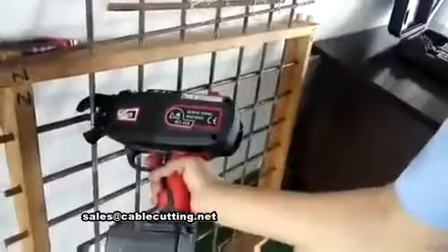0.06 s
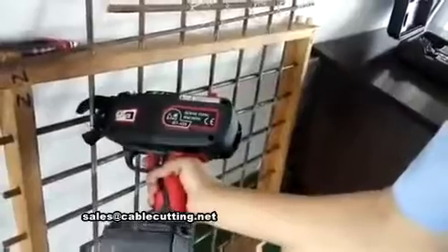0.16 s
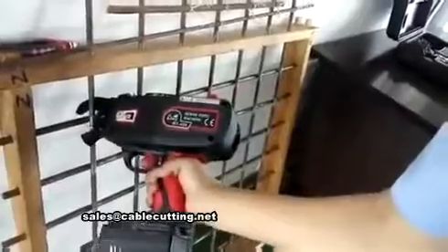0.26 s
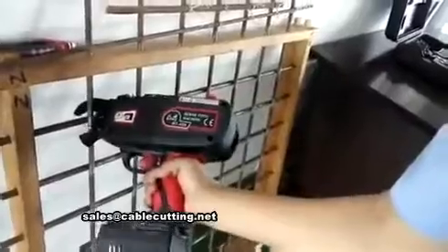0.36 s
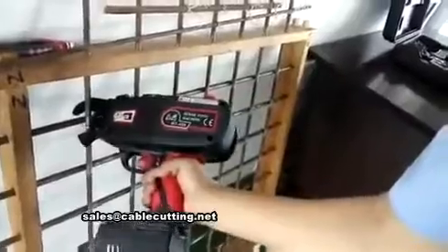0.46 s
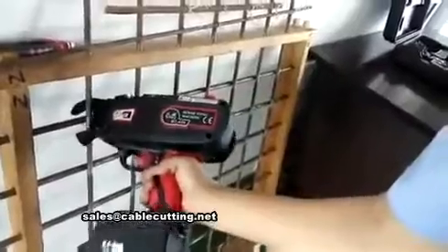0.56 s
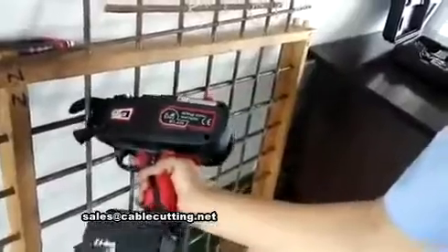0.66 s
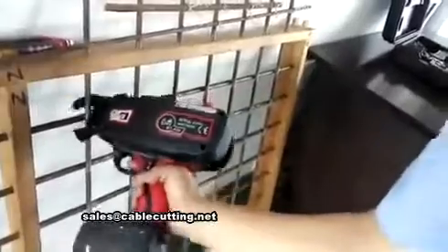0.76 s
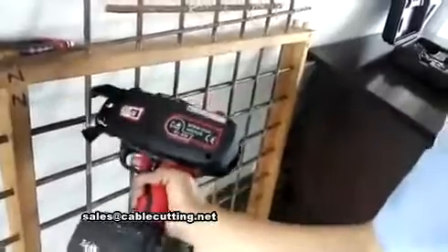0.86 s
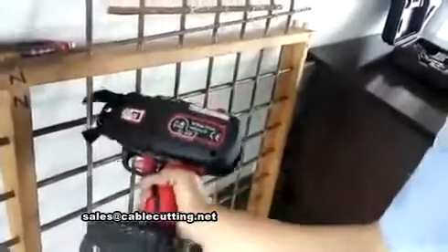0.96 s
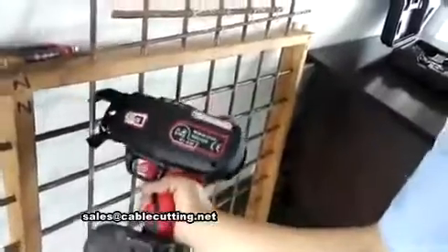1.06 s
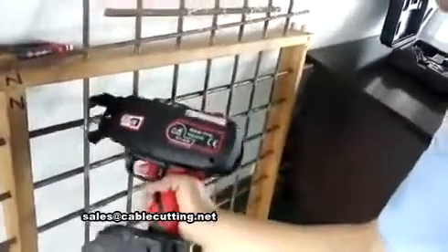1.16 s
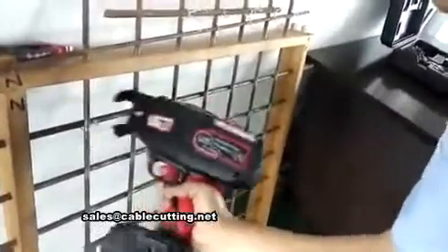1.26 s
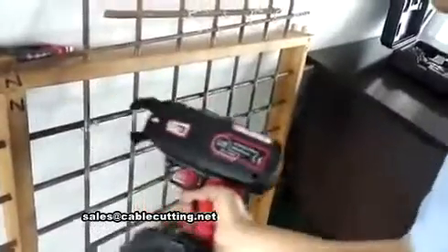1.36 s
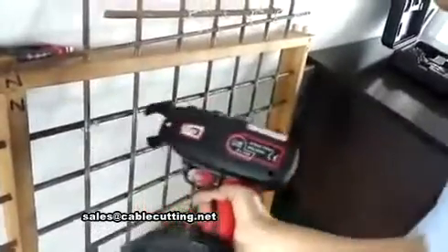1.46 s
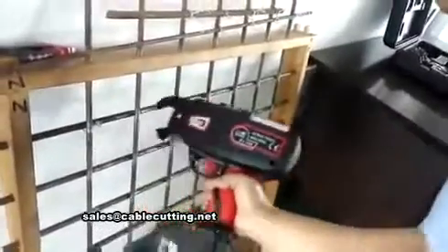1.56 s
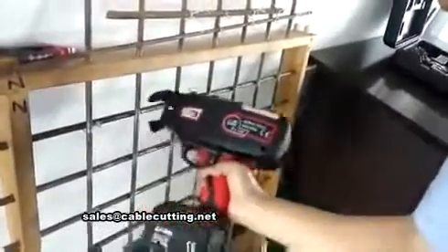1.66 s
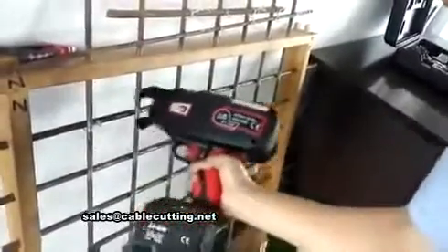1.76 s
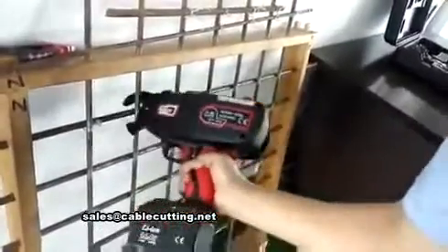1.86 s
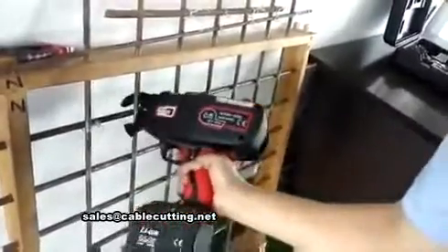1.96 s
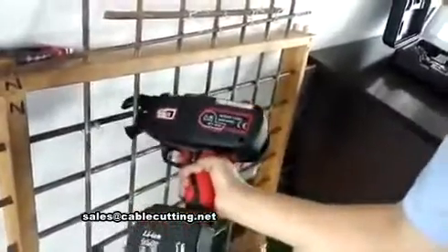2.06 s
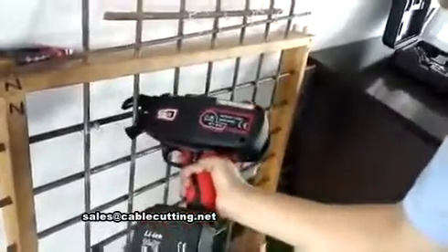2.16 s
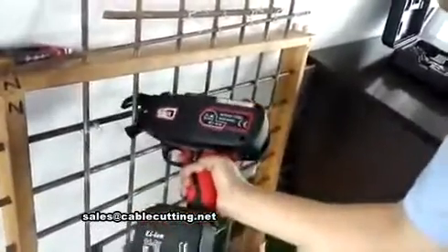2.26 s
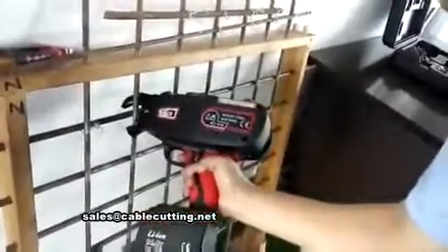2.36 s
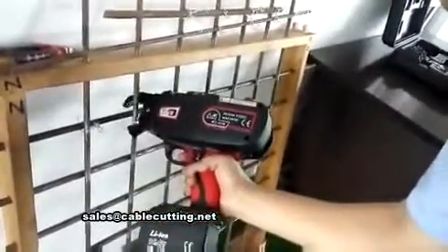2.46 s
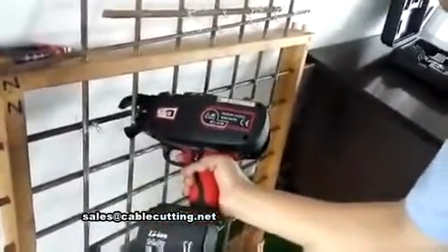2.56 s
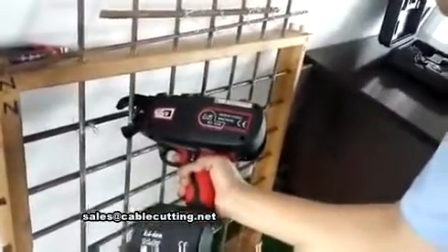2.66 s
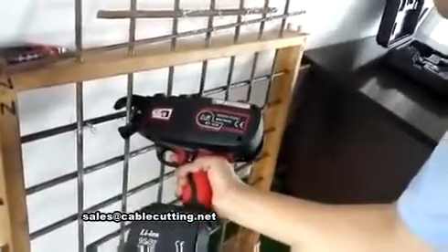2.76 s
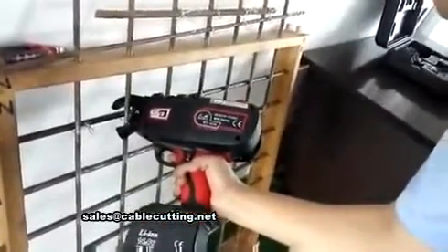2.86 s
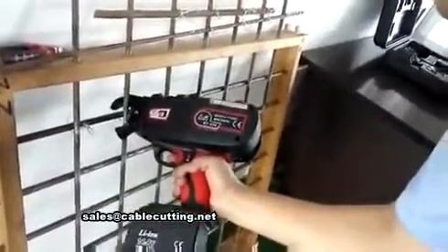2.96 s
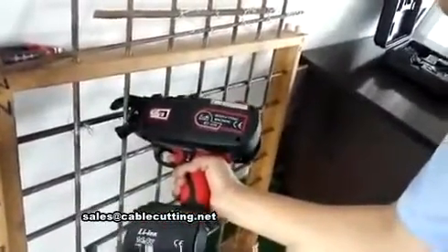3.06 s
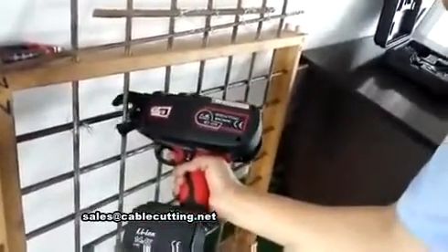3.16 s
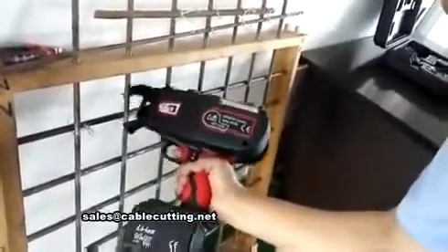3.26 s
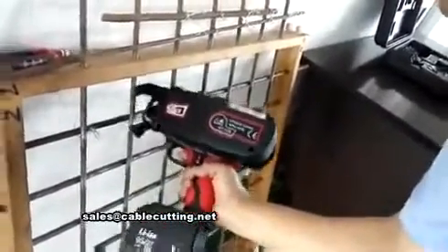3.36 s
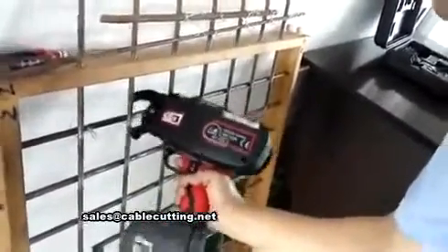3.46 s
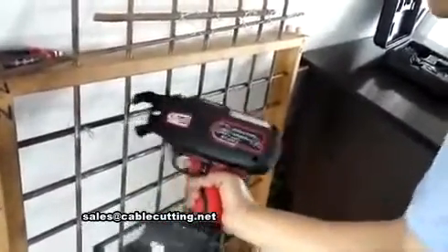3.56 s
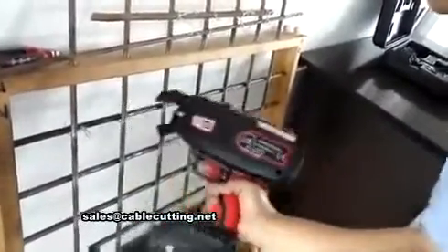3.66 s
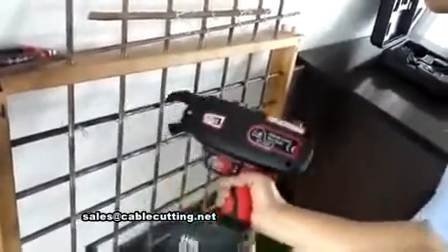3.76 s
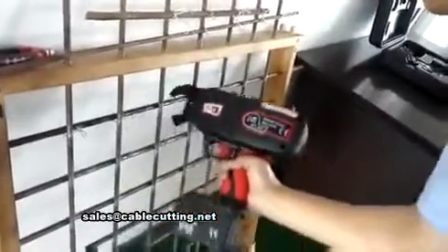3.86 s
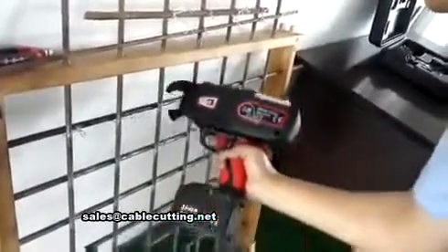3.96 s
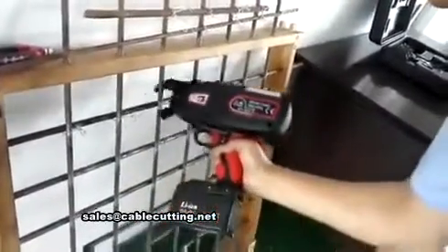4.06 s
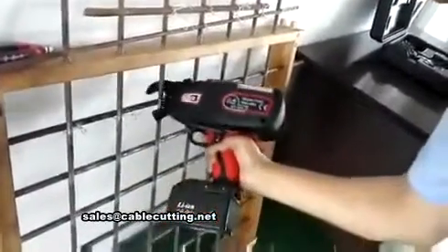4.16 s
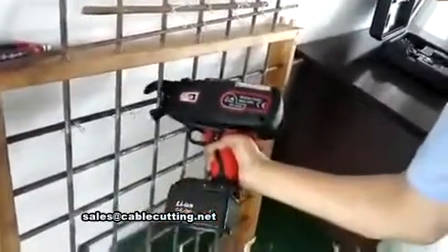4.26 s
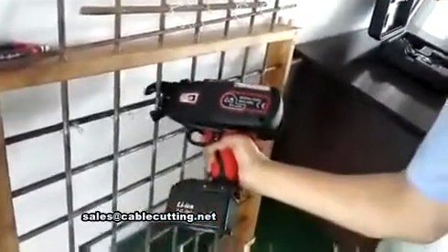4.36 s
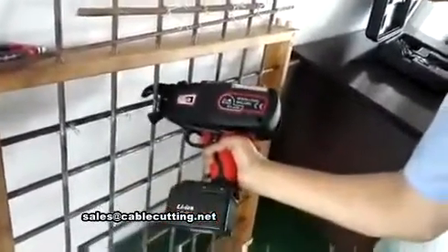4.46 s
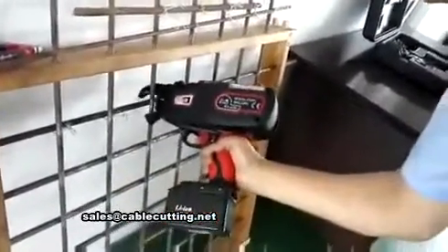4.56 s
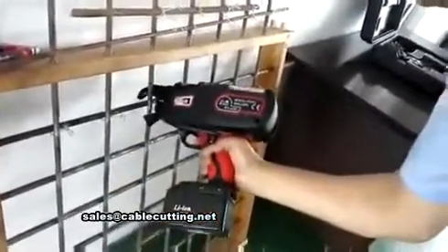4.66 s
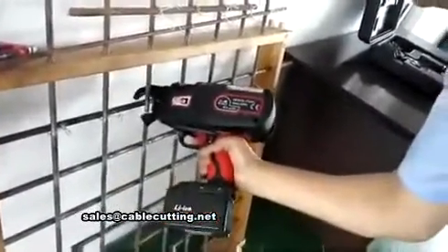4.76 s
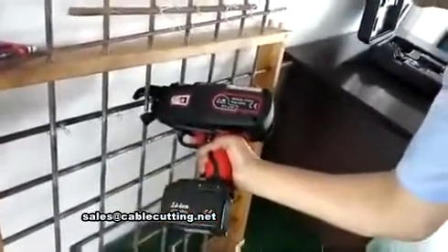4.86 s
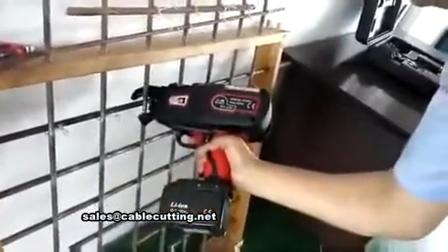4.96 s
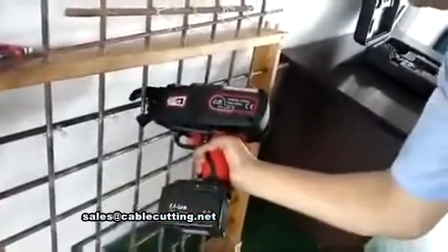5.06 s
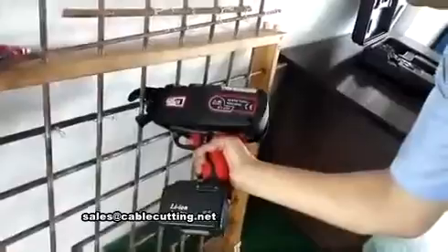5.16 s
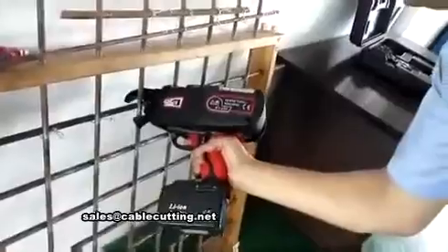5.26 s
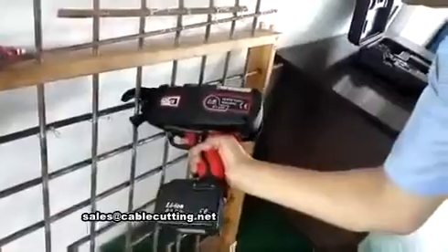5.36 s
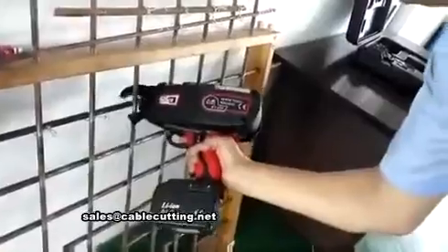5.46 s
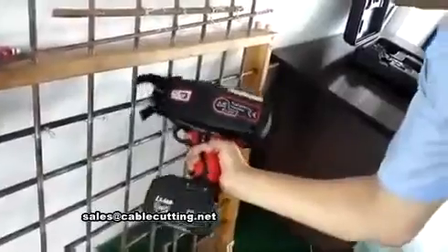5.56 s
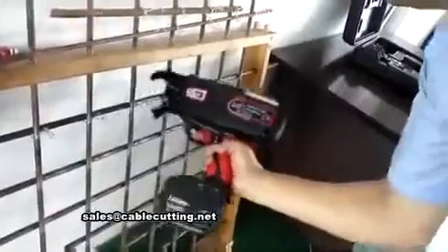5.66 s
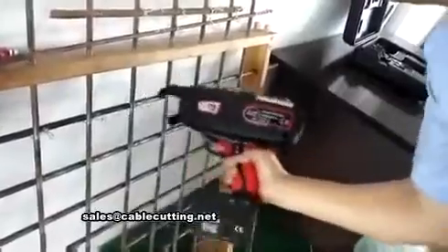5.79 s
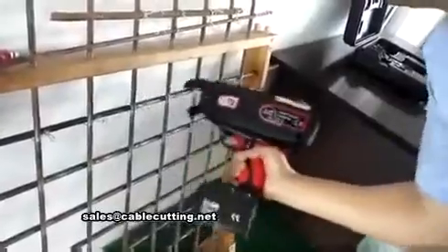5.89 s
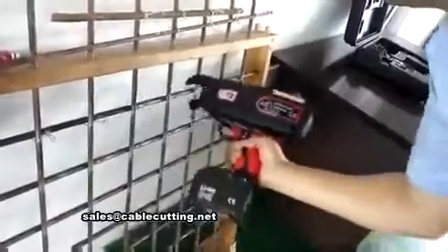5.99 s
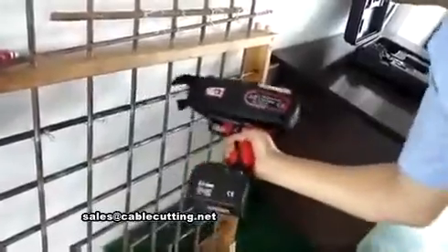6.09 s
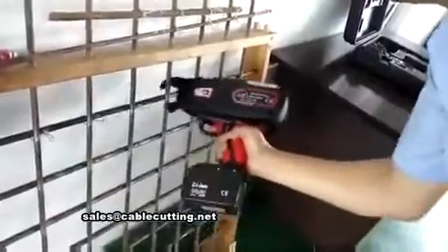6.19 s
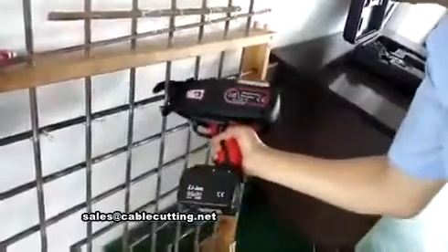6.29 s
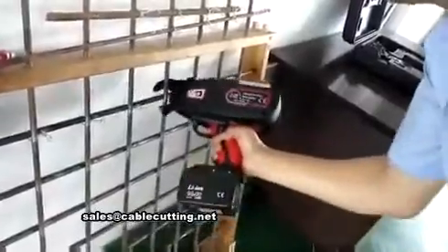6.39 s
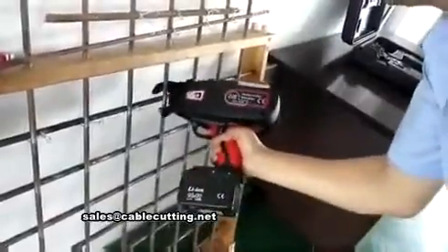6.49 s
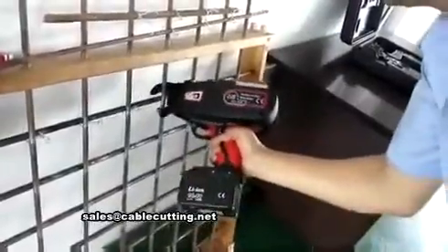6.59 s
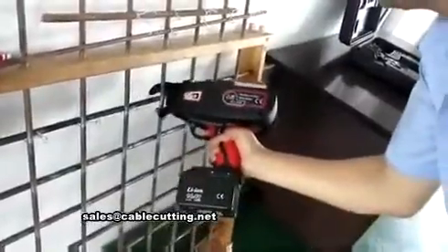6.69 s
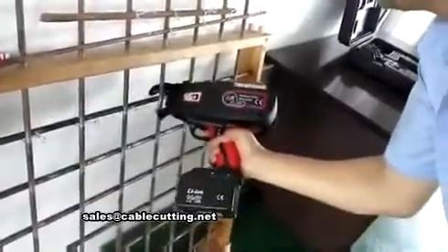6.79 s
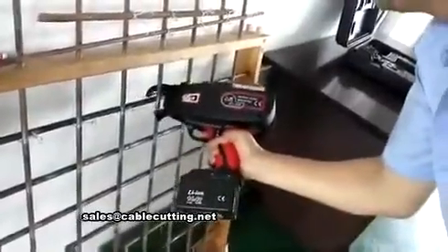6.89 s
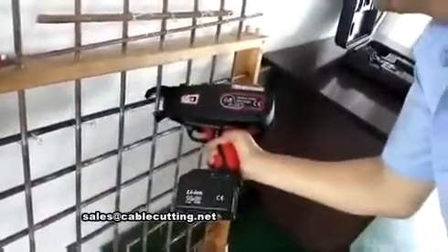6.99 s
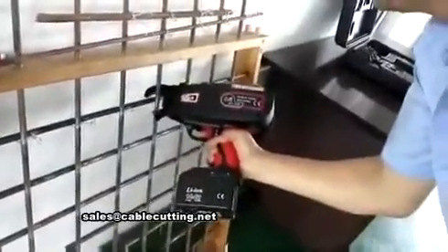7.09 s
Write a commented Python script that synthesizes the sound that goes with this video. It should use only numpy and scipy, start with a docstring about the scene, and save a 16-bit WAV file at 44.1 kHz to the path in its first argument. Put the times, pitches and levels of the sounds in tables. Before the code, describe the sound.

A cordless rebar tying tool buzzes, clacks and whines in repeated bursts, its nose jerking free with clattering booms from a framed steel mesh indoors.

```python
"""Whining, clattering bursts of a cordless rebar tier, then booms and rattles of a steel mesh in a wooden frame.
In each tie gear noise and wire rasp spin up, slack gears tick as the drive creeps, a tooth whine twists and
sags under load, and the drive ticks home; shaped contact noise makes the clacks inside the casing.
Pulling the nose free cracks, rings the mesh modes and shakes the frame. A bare room echoes it all over soft air."""
import sys
import numpy as np
from scipy import signal
from scipy.fft import rfft, irfft, next_fast_len
from scipy.io import wavfile
from scipy.ndimage import uniform_filter1d, map_coordinates

SR = 44100
rng = np.random.default_rng(int(sys.argv[2]) if len(sys.argv) > 2 else 0)


def unload_wav(signal):
    """Save mono or channel-first audio to the path in sys.argv[1] as 16-bit WAV at rate SR, clipped to [-1, 1]."""
    wavfile.write(
        sys.argv[1],
        SR,
        np.round(np.clip(np.atleast_2d(signal).T, -1, 1) * 32767).astype(np.int16),
    )


N = 314433
TIME = np.arange(N) / SR

# All levels in the tables are relative: the layers trim them further.
# The ties. Each row: trigger in seconds, wait for the twist in seconds, twist length in seconds, way home
# in seconds, loudness in dB, sag of the whine at full load in Hz, homing gears in dB, end stop in dB.
TIES = [(-0.518, 0.55, 0.693, 0.19, -0.65, 345.4, -21, -5.5),
        (1.928, 0.55, 0.603, 0.22, 0.06, 285.7, -19.5, -14.5),
        (4.167, 0.56, 0.69, 0.192, 0, 315.7, -22, -7), (6.329, 0.542, 0.63, 0.2, -1.07, 330.4, -12, -12)]
# The nose snags on the mesh. Each row: time in seconds, crack of the bars in dB, boom in dB, knock of the
# frame in dB.
SNAGS = [(1.214, -19, -30, -38), (1.234, -2.5, -18, -22), (1.311, -9.5, -29, -6), (1.32, -7.5, -20.5, -6.5),
         (1.342, -17, -21, -16.5), (3.567, -11.5, -14.5, -9.5), (3.577, -5.5, -15.5, -6),
         (3.66, -14, -23, -11), (3.68, -9.5, -20, -12.5), (3.739, -18.5, -27, -12),
         (5.756, -19, -26.5, -30)]
# The nose slides off the tied wire. Each row: time in seconds, peak in dB.
SCRAPES = [(3.48, -39), (5.81, -28.5)]
# The tool leans on the frame. Each row: time in seconds, peak in dB.
LEANS = [(0.9, -31.5), (3.2, -32), (5.6, -31), (5.95, -31.5)]
# A feed stroke jolts, eases and pulls again. Each row: seconds after the trigger, gear chatter in dB.
FEED_CHATTER = [(0, -18.5), (0.035, -14), (0.06, -24.5), (0.13, -16), (0.2, -18), (0.274, -23)]

# Spectra of the wire feed, creeping gears, twisting gears, clacks in the casing, mesh contacts, frame boom,
# room air, wire scrape and frame knock. Each row: frequency in Hz, noise density in dB.
FEED_COLOUR = [(100, -10.5), (550, -11.5), (760, 2.5), (1050, -0.5), (2100, -2.5), (2900, -2), (4200, -3),
               (7000, -8.5), (10000, -19.5), (14500, -21)]
CREEP_COLOUR = [(100, -29.5), (330, -6.5), (600, -12.5), (790, 1), (1000, -6), (1400, 6.5), (1900, -3),
                (3200, -6.5), (5000, -9), (7000, -17), (10000, -23.5), (14500, -28)]
TWIST_COLOUR = [(100, -30), (300, -9.5), (520, -6), (630, -8.5), (800, -1), (1250, 0.5), (2100, 2.5),
                (2650, -1), (3400, 2.5), (5200, -0.5), (7200, -7), (10000, -10), (14500, -14.5)]
CLACK_COLOUR = [(100, -12.5), (400, -6), (900, -0.5), (1400, 6), (2200, -2), (4000, -5), (7000, -7.5),
                (14500, -23)]
MESH_COLOUR = [(100, -6.5), (230, -1), (360, 3.5), (550, -7), (800, -0.5), (1200, 4), (2100, -5.5),
               (2800, -1.5), (4500, -5.5), (7000, -6), (10000, -23), (14500, -25.5)]
SWAY_COLOUR = [(25, -39), (42, -36), (68, 0.5), (110, -6.5), (150, -2), (220, -6), (350, -15.5), (500, -21),
               (1000, -50), (4000, -91)]
AIR_COLOUR = [(25, -10), (70, 4.5), (200, 5), (270, -0.5), (340, 1), (500, -5), (1200, -3.5), (2700, -7.5),
              (4500, -13), (7000, -12), (10000, -23), (14500, -25.5)]
SCRAPE_COLOUR = [(300, -5), (1500, 10), (5000, -5), (12000, -4.5)]
KNOCK_COLOUR = [(100, -8), (350, -5.5), (700, -2), (1300, 2.5), (2000, -16), (6000, -32.5)]

# Resonances of the gear casing while feeding and twisting. Each row: frequency in Hz, width in Hz, level in dB.
FEED_RINGS = [(1422, 273, -4), (1620, 120.4, 0.5)]
TWIST_RINGS = [(1277, 173, -7.5), (1443, 150, -5), (1617, 79, -3)]
# Ringing modes of mesh and frame. Each row: frequency in Hz, level in dB, time to fall 60 dB in seconds.
MESH_MODES = [(111, 0, 0.44), (118.8, -4.5, 0.36), (186, -9.5, 0.49), (210.4, -8, 0.5), (270, -6, .3),
              (353, 0, 0.11), (705, -15, 0.98), (1100, -20, .45), (1120, -19, .4), (1330, -18, .3),
              (1580, -5, .4), (2584, -16, .5), (2690, -25, 1), (7100, -31, 0.74)]
# The room's decay. Each row: frequency in Hz, time to fall 60 dB in seconds.
ROOM_T60 = [(100, 1), (500, 1), (1500, 0.8), (4000, 1), (8000, 0.43), (14000, 1)]

TRIGGER, WAIT_S, TWIST_S, HOMING_S, TIE_DB, SAG_HZ, HOMING_DB, STOP_DB = np.transpose(TIES)
TWIST_START = TRIGGER + WAIT_S
TWIST_END = TWIST_START + TWIST_S
HOME = TWIST_END + HOMING_S
# Every tie feeds, cuts and grips at the same times: seconds after the trigger.
FEED_S, CUT_S, GRIP_S = 0.276, 0.319, 0.478


def from_db(db):
    """Turn decibels into an amplitude factor."""
    return 10 ** (np.asarray(db) / 20)


def rms_one(x):
    """Scale a signal to an rms of 1."""
    return x / np.sqrt(np.mean(x ** 2) + 1e-20)


def at_hz(points, hz):
    """Read a table on a log-frequency axis."""
    known, values = np.transpose(points)
    return np.interp(np.log(np.maximum(hz, 1)), np.log(known), values)


def drift(hz):
    """Random wander of rms 1 through about two new values per cycle of the given rate."""
    knots = rng.standard_normal(int(N / SR * hz * 2) + 2)
    return rms_one(np.interp(TIME, np.linspace(0, N / SR, len(knots)), knots))


def colour(x, points):
    """Causal (minimum-phase) filter with the given spectrum; white noise keeps its power."""
    size = 2 * next_fast_len(N // 2 + SR // 10)
    hz = np.arange(size // 2 + 1) * SR / size
    gain = rms_one(from_db(at_hz(points, hz)))
    # folding the cepstrum forward in time gives the minimum phase
    cepstrum = irfft(np.log(gain))[:size // 2]
    cepstrum[1:] *= 2
    response = np.exp(rfft(cepstrum, size))
    return irfft(rfft(x, size) * response)[..., :N]


def resonate(x, rings):
    """Parallel resonances of alternating sign; rms 1."""
    out = 0
    for k, (hz, width, db) in enumerate(rings):
        r = np.exp(-np.pi * width / SR)
        poles = [1, -2 * r * np.cos(2 * np.pi * hz / SR), r * r]
        ring = (1 - r * r) * signal.lfilter([1, 0, -1], poles, x)
        out = out + (-1) ** k * from_db(db) * ring
    return rms_one(out)


def grains(per_s, spread_db, hiss):
    """Random metal contacts of uneven size over a sliding hiss; rms 1."""
    born = rng.random(N) < per_s / SR
    white = rng.standard_normal(N)
    size_db = spread_db * np.minimum(rng.exponential(1, N)[born], 4)
    clicks = np.zeros(N)
    clicks[born] = from_db(size_db) * np.sign(white[born])
    return rms_one(rms_one(clicks) + hiss * white)


def throb(turns, fade, depth, uneven_db):
    """Once a turn the gears bite, each time with another force, and relax within a share of the turn."""
    bite_forces = from_db(uneven_db * rng.standard_normal(int(turns[-1]) + 1))
    force = bite_forces[turns.astype(int)]
    return rms_one(1 + depth * force * np.exp(-(turns % 1) / fade))


def stroke(starts, ends, edge_s):
    """For a motor that runs between these times: soft gate, age (s), progress (0-1) and number of the run."""
    run = np.maximum(np.searchsorted(starts, TIME + edge_s) - 1, 0)
    age, length = TIME - starts[run], (ends - starts)[run]
    running = (age >= 0) * (age < length) * 1.
    on = uniform_filter1d(running, max(1, int(edge_s * SR)))
    age = np.clip(age, 0, length)
    return on, age, age / length, run


def swells(times, levels_db, rise_s, fade_s):
    """Envelope of events that each rise to their time and die away; their powers add."""
    power = np.zeros(N)
    for s, db in zip(times, levels_db):
        near = slice(*np.searchsorted(TIME, [s - 8 * rise_s, s + 8 * fade_s]))
        age = TIME[near] - s
        shape = np.exp(-np.maximum(age / fade_s, -age / rise_s))
        power[near] += (from_db(db) * shape) ** 2
    return np.sqrt(power)


def bursts(times, levels_db, rise_s, fade_s):
    """Every blow is a flurry of contacts with a short soft rise and a longer fall."""
    return swells(times, levels_db, rise_s, fade_s) * grains(per_s=4000, spread_db=1.5, hiss=0.97)


def two_ports(draws, alike_hz):
    """Diffuse sound at two close microphones: shared in the bass, unrelated above."""
    mid, side = draws
    side = signal.sosfilt(signal.butter(2, alike_hz, "high", fs=SR, output="sos"), side)
    return np.array([mid + side, mid - side]) / np.sqrt(2)


def room_air(level_db=-37.5):
    """The still room is a steady bed of coloured noise, wider in the treble than in the bass."""
    return from_db(level_db) * colour(two_ports(rng.standard_normal((2, N)), alike_hz=350), AIR_COLOUR)


def room(x, early_db, early_s, late_db):
    """Quick reflections from wall and frame, then a tail that dies band by band."""
    t = TIME[:SR]
    edges = np.geomspace(60, 16000, 9)  # Hz
    tail = 0
    for low, high in zip(edges, edges[1:]):
        band_pass = signal.butter(2, [low, high], "band", fs=SR, output="sos")
        band = signal.sosfilt(band_pass, rng.standard_normal((2, SR)))
        t60 = at_hz(ROOM_T60, np.sqrt(low * high))
        tail = tail + band * np.exp(-np.log(1000) * t / t60)
    sparse = rng.standard_normal((2, SR)) * (rng.random(SR) < .06)
    early = sparse * np.exp(-t / early_s) * (t > .001)
    response = from_db(early_db) * rms_one(early) + from_db(late_db) * rms_one(tail * (t > .008))
    ports = two_ports(response, alike_hz=463) / np.sqrt(SR)
    return signal.fftconvolve(x[None], ports, axes=1)[:, :N]


def moving_room(x, wander_s=0.000356, place_count=2):
    """The tool wanders over the mesh: each place has its own echoes, and their paths keep changing in length."""
    place = np.linspace(0, place_count - 1, N)
    echo = 0
    for k in range(place_count):
        share = np.cos(np.pi / 2 * np.minimum(abs(place - k), 1))
        echo = echo + room(x * share, early_db=0.0, early_s=0.01, late_db=-4.0)
    moved = []
    for side in echo:
        path = np.maximum(TIME - wander_s * (2 + drift(2.5)), 0)
        moved.append(map_coordinates(side, [path * SR], order=3))
    return np.array(moved)


def sway(held_db=-45.0, shaken_db=-9.0):
    """The whole frame booms as the tool leans on it and lets go; its lowest mode stands out."""
    times, _, booms_db, _ = np.transpose(SNAGS)
    shaken = swells(times, booms_db + shaken_db, rise_s=0.0051, fade_s=0.28)
    leaning = swells(*np.transpose(LEANS), rise_s=0.13, fade_s=0.19)
    rumble = colour(rng.standard_normal(N), SWAY_COLOUR)
    lowest_mode = resonate(rng.standard_normal(N), [(109.7, 16.6, 0)])  # Hz, width Hz, dB
    boom = from_db(-2.0) * rumble + from_db(-2) * lowest_mode
    return np.sqrt(from_db(held_db) ** 2 + shaken ** 2 + leaning ** 2) * boom


def scrapes():
    """Steel slides on wire with a short, bright rasp."""
    rasp = colour(grains(per_s=1700, spread_db=-2.5, hiss=0.6), SCRAPE_COLOUR)
    return swells(*np.transpose(SCRAPES), rise_s=0.032, fade_s=0.024) * rasp


def ring_mesh(times, booms_db):
    """Each jerk strikes every mode of mesh and frame, with slightly uneven force, and the modes ring out."""
    ringing = np.zeros(N)
    for hz, mode_db, t60 in MESH_MODES:
        blows = np.zeros(N)
        uneven_db = 0.61 * rng.standard_normal(len(times))
        blows[(times * SR).astype(int)] = from_db(booms_db + mode_db + uneven_db)
        r, w = from_db(-60 / (t60 * SR)), 2 * np.pi * hz / SR
        # the tiny offset keeps the filter clear of vanishingly small numbers
        ringing += signal.lfilter([.5, 0, -.5], [1, -2 * r * np.cos(w), r * r], blows + 1e-18)
    return ringing


def snags(crack_db=-7.5, rattle_db=-14.5, knock_db=-4, ringing_db=-8):
    """The nose jerks free: a crack, ringing bars, and the mesh knocking and chattering against its frame."""
    times, cracks_db, booms_db, knocks_db = np.transpose(SNAGS)
    ringing = ring_mesh(times, booms_db)
    crack = from_db(crack_db) * bursts(times, cracks_db, rise_s=0.0027, fade_s=0.0086)
    chatter = swells(times, cracks_db, rise_s=0.0093, fade_s=0.062)
    chatter = chatter * grains(per_s=790, spread_db=3.5, hiss=0.33)
    rattle = from_db(rattle_db + 4 * drift(45)) * chatter
    knock = colour(bursts(times, knocks_db, rise_s=0.0024, fade_s=0.0077), KNOCK_COLOUR)
    return colour(crack + rattle, MESH_COLOUR) + from_db(knock_db) * knock + from_db(ringing_db) * ringing


def clacks(cut_db=-13, grip_db=-8, engage_db=-8, trim_db=-2.5):
    """In each tie the cutter, the hook, the drive and the end stop strike inside the casing."""
    times = np.column_stack([TRIGGER + CUT_S, TRIGGER + GRIP_S, TWIST_START, HOME]).ravel()
    levels_db = np.ravel([(cut_db, grip_db, engage_db, stop_db) for stop_db in STOP_DB])
    blows = bursts(times, levels_db, rise_s=0.0025, fade_s=0.0098)
    return from_db(trim_db) * colour(blows, CLACK_COLOUR)


def creep(turn_hz=75, out_db=-24, gripping_db=-20, grip_lead_s=0.05, homing_rise_db=3,
          whine_hz=2180, whine_sag_hz=250, whine_db=-28):
    """At low power slack gears tick unevenly: out to the wire, louder and whining at the grip, then home."""
    grip = TRIGGER + GRIP_S - grip_lead_s
    out = stroke(TRIGGER + FEED_S, grip, edge_s=0.0065)[0]
    gripping, _, closed, _ = stroke(grip, TWIST_START, edge_s=0.0065)
    homing, _, progress, tie = stroke(TWIST_END, HOME, edge_s=0.0065)
    homing_db = HOMING_DB[tie] + homing_rise_db * progress ** 2
    level = out * from_db(out_db) + gripping * from_db(gripping_db) + homing * from_db(homing_db)
    turns = np.cumsum(turn_hz * from_db(2.2 * drift(6))) / SR
    bite = throb(turns, fade=0.13, depth=2.2, uneven_db=1.5)
    ticks = grains(per_s=2000, spread_db=-0.5, hiss=0.16) * bite
    whine_pitch = (whine_hz - whine_sag_hz * closed) * (1 + 0.0196 * drift(200))
    whine = np.sin(2 * np.pi * np.cumsum(whine_pitch) / SR)
    return level * colour(ticks, CREEP_COLOUR) + gripping * from_db(whine_db) * whine


def feed(start_hz=85, gain_hz_per_s=175, top_hz=124, tooth_count=14,
         rasp_db=-21.5, rasp_rise_db=2, overtone_db=-6):
    """The feed wheel speeds up in each stroke; its teeth ring the casing while wire rasps through the guide."""
    on, age, progress, tie = stroke(TRIGGER, TRIGGER + FEED_S, edge_s=0.026)
    wheel_hz = np.minimum(start_hz + gain_hz_per_s * age, top_hz)
    turns = np.cumsum(wheel_hz * (1 + .02 * drift(80))) / SR
    bite = throb(turns, fade=0.071, depth=11, uneven_db=3)
    tooth_phase = 2 * np.pi * tooth_count * turns
    contacts = grains(per_s=2500, spread_db=4.5, hiss=0.23) + 0.15 * np.sin(tooth_phase)
    chatter = resonate(bite * contacts, FEED_RINGS)
    sliding = grains(per_s=2400, spread_db=2.0, hiss=0.59)
    rasp = colour(sliding * throb(turns, fade=0.18, depth=0.84, uneven_db=3.0), FEED_COLOUR)
    overtone = from_db(overtone_db) * np.sqrt(bite) * np.sin(2 * tooth_phase)
    wire = from_db(rasp_db + rasp_rise_db * progress) * (rasp + overtone)
    chatter_db = np.interp(age, *np.transpose(FEED_CHATTER))
    return on ** 2 * from_db(TIE_DB[tie]) * (wire + from_db(chatter_db) * chatter)


def twist(free_hz=1922, spin_up_hz=88, spin_up_s=0.055, tight_from=0.35, sag_power=1.6,
          tooth_count=33, pinion_count=9, whine_db=-23, whine_load_db=-5.0, pinion_db=-41,
          clatter_db=-16, clatter_load_db=-1, treble_load_db=-3, treble_hz=3000,
          ring_db=-20.5, ring_load_db=2.0):
    """The hook spins near 58 turns/s: gears clatter each turn, dull with load, and the tooth whine sags."""
    on, age, progress, tie = stroke(TWIST_START, TWIST_END, edge_s=0.012)
    # the wire tightens from this share of the stroke on
    load = np.clip((progress - tight_from) / (1 - tight_from), 0, 1) ** sag_power
    tooth_hz = free_hz - spin_up_hz * np.exp(-age / spin_up_s) - SAG_HZ[tie] * load
    teeth = np.cumsum(tooth_hz * (1 + .003 * drift(40))) / SR
    turns = teeth / tooth_count
    tooth_tone = np.sin(2 * np.pi * teeth)
    bite = throb(turns, fade=0.21, depth=3.1, uneven_db=0.7)
    clatter = colour(bite * grains(per_s=2000, spread_db=3.0, hiss=0.46), TWIST_COLOUR)
    treble = signal.sosfilt(signal.butter(1, treble_hz, "high", fs=SR, output="sos"), clatter)
    clatter = clatter - (1 - from_db(treble_load_db * load)) * treble
    # as the whine sags into the casing's resonances it turns into a growl
    contacts = grains(per_s=2000, spread_db=-1.0, hiss=0.66) + 0.045 * tooth_tone
    ring = resonate(bite * contacts, TWIST_RINGS)
    whine = from_db(whine_db + whine_load_db * load + 2.0 * drift(30)) * tooth_tone
    pinion_tone = np.sin(2 * np.pi * pinion_count * turns)
    pinion = from_db(pinion_db + 6.8 * drift(30)) * bite * pinion_tone
    gears = from_db(clatter_db + clatter_load_db * load) * clatter
    gears = gears + from_db(ring_db + ring_load_db * load) * ring
    return on * from_db(TIE_DB[tie]) * (gears + whine + pinion)


def from_the_right(x, shadow_db=-7, low_hz=1100, high_hz=9000):
    """The left microphone is shadowed from the direct sound in the middle and treble."""
    band_pass = signal.butter(1, [low_hz, high_hz], "band", fs=SR, output="sos")
    shadowed = signal.sosfilt(band_pass, x)
    return np.array([x - (1 - from_db(shadow_db)) * shadowed, x])


def scene():
    """Tool and mesh lie a little to the right, within arm's reach, over the room's air and echoes."""
    near = scrapes() + snags() + clacks() + creep() + feed() + twist()
    direct = from_db(-1.5) * from_the_right(near)
    echo = moving_room(near) * from_db([[-1], [.4]])  # left, right
    return room_air() + sway() + echo + direct


def record(dry, ceiling=.88, gap_low_hz=7750, gap_high_hz=9300, cutoff_hz=14400):
    """Peaks are rounded; a narrow band of the treble is missing and the top is cut."""
    rounded = dry / (1 + np.abs(dry / ceiling) ** 3) ** (1 / 3)
    passes = signal.firwin(601, [gap_low_hz, gap_high_hz, cutoff_hz], window=("kaiser", 6), fs=SR)
    return signal.fftconvolve(rounded, passes[None], "same", axes=1)


dry = scene()
out = record(dry)
unload_wav(out)
```